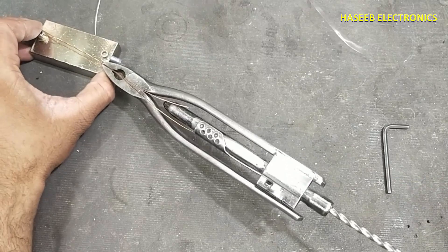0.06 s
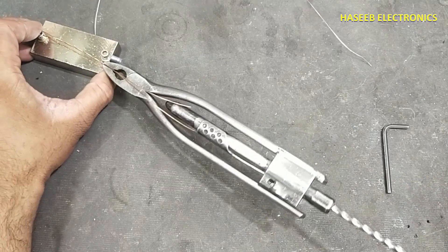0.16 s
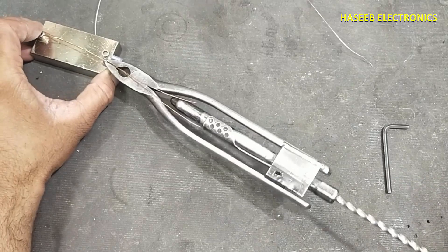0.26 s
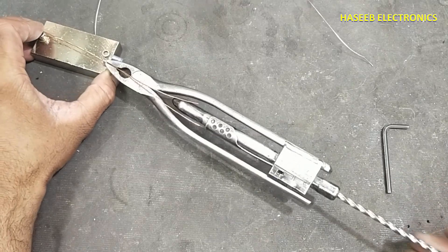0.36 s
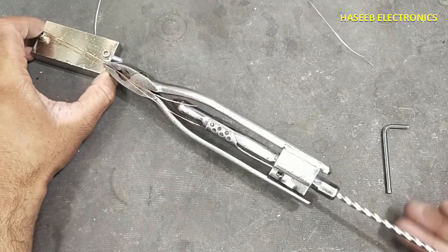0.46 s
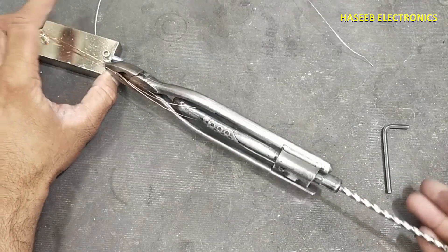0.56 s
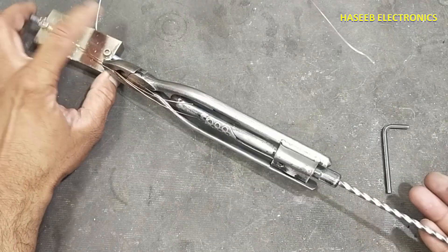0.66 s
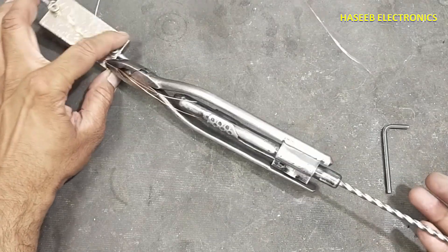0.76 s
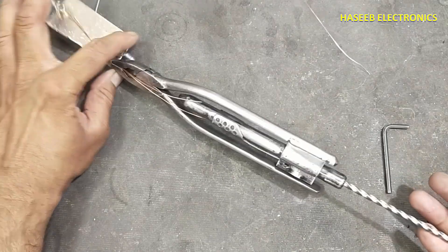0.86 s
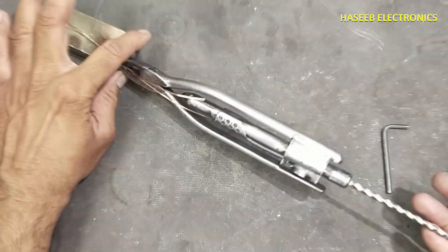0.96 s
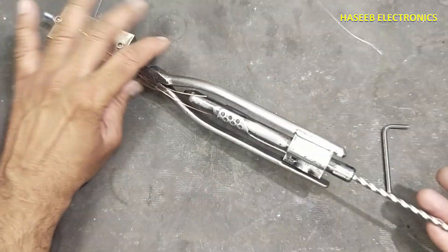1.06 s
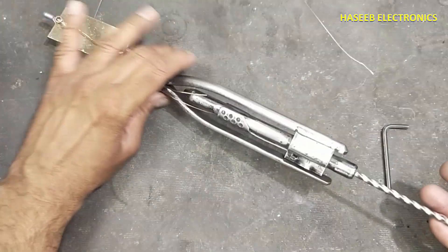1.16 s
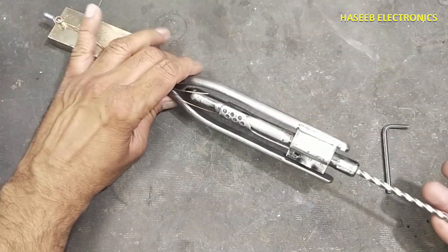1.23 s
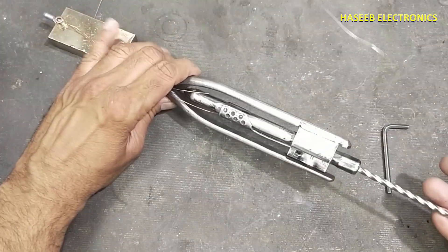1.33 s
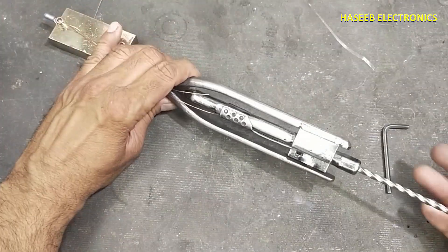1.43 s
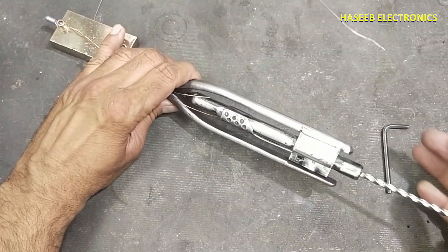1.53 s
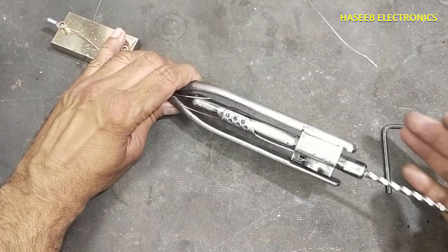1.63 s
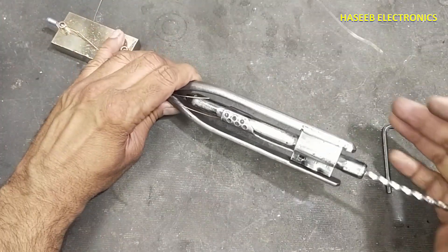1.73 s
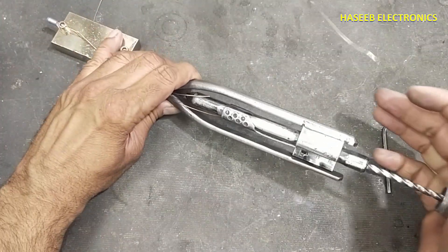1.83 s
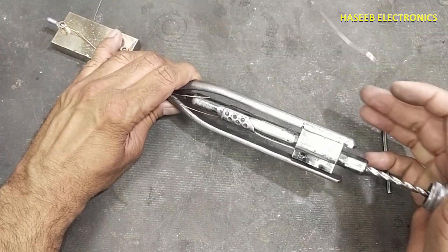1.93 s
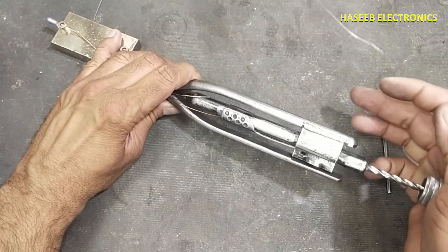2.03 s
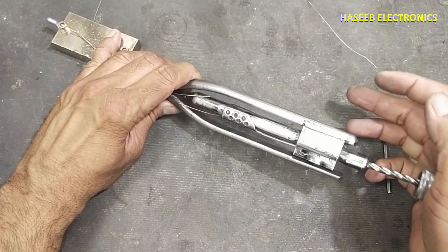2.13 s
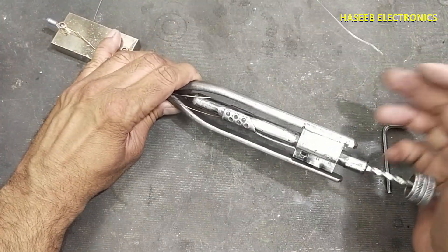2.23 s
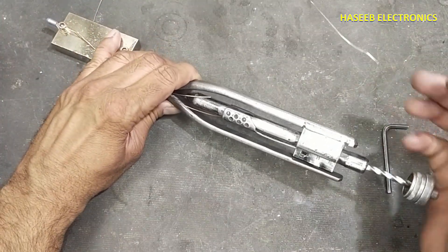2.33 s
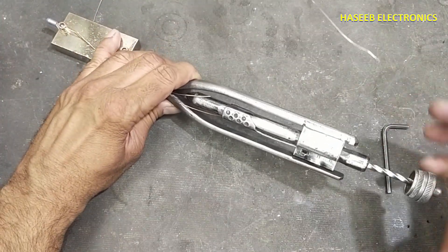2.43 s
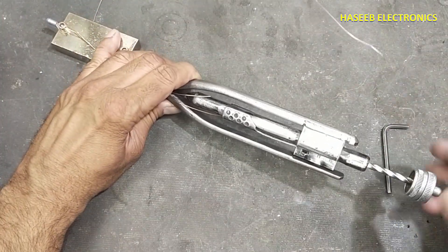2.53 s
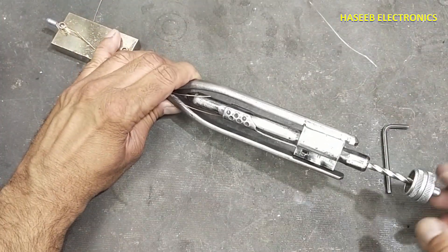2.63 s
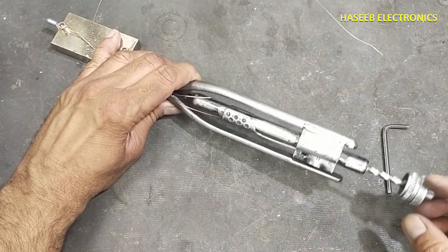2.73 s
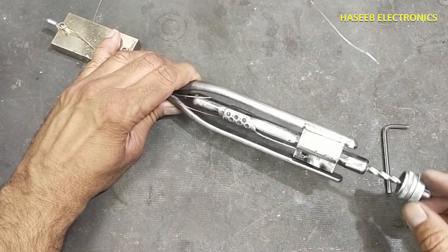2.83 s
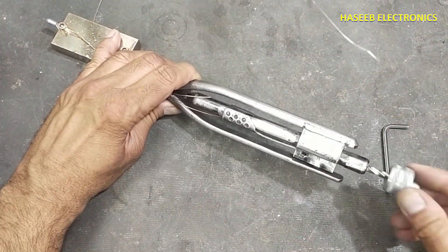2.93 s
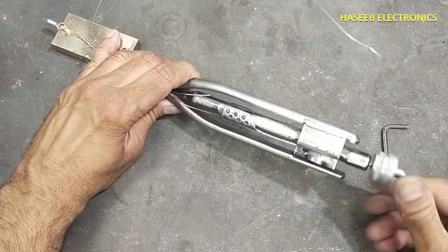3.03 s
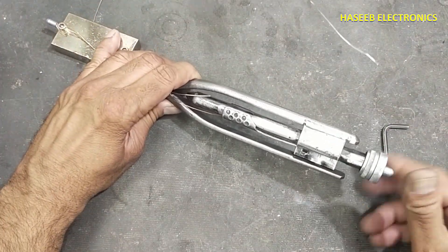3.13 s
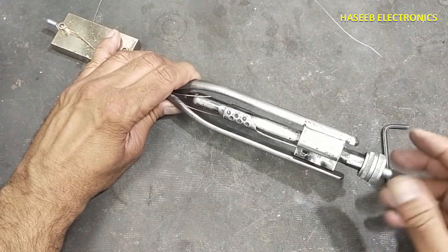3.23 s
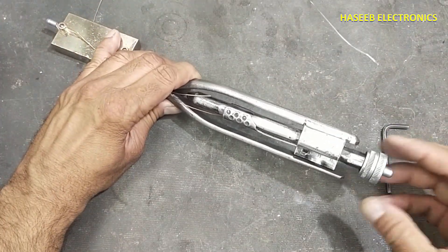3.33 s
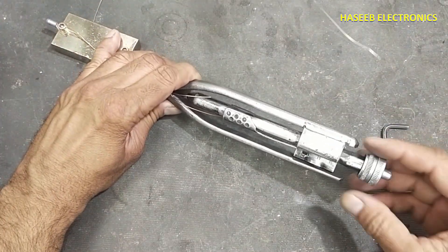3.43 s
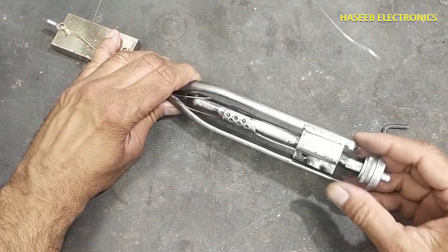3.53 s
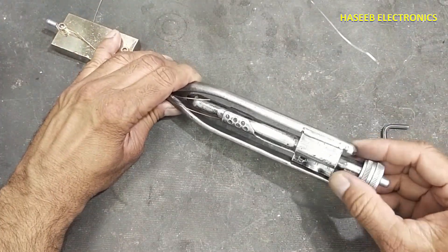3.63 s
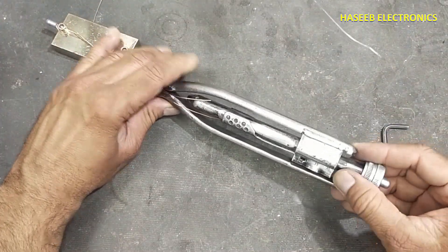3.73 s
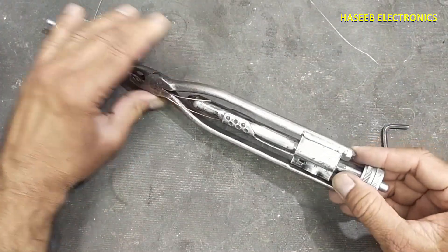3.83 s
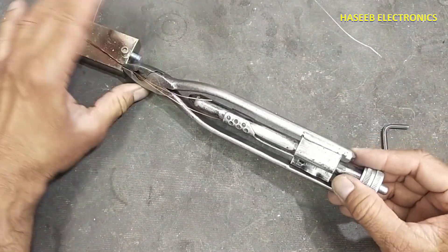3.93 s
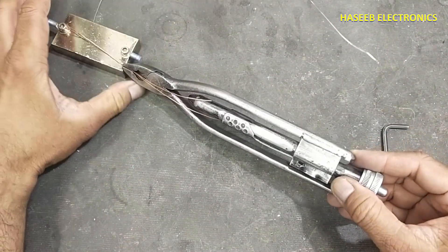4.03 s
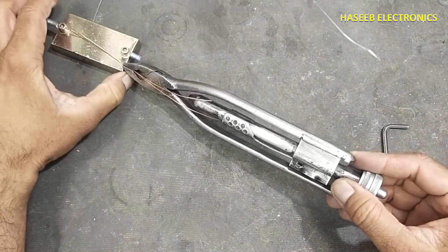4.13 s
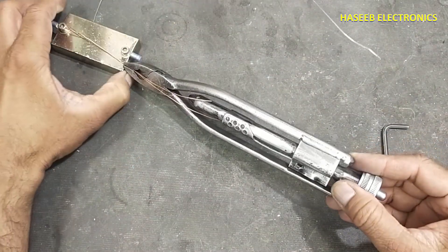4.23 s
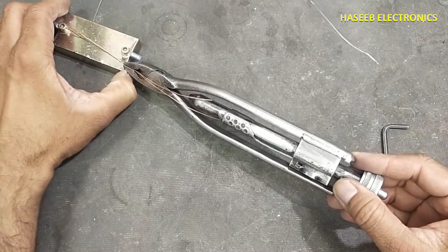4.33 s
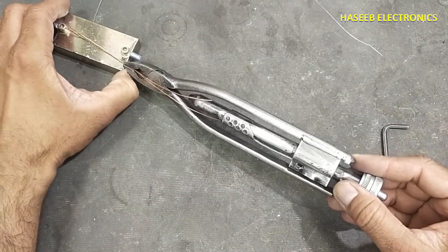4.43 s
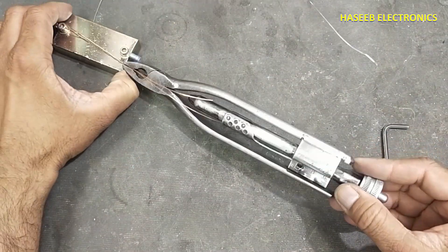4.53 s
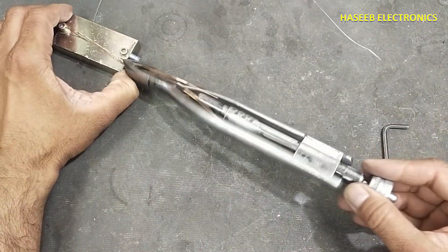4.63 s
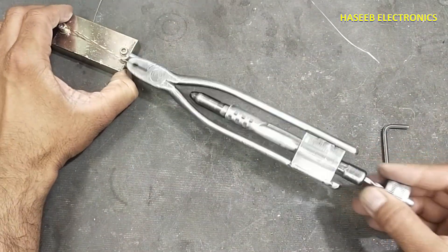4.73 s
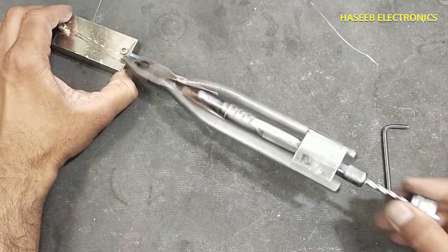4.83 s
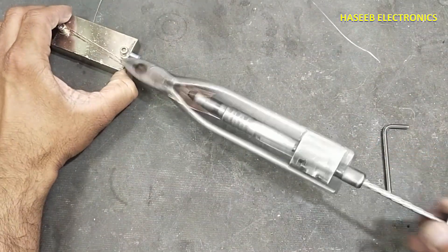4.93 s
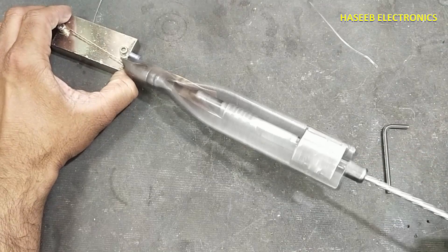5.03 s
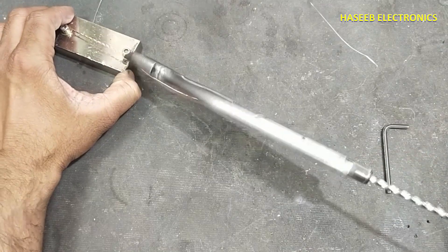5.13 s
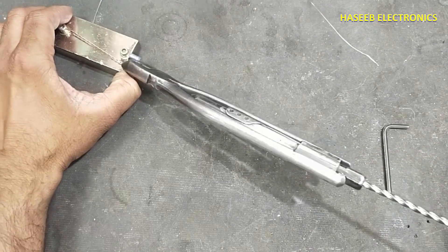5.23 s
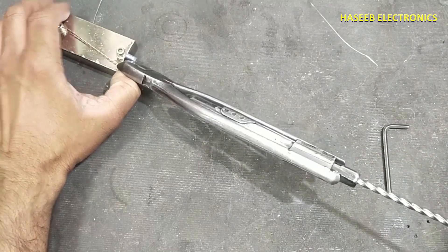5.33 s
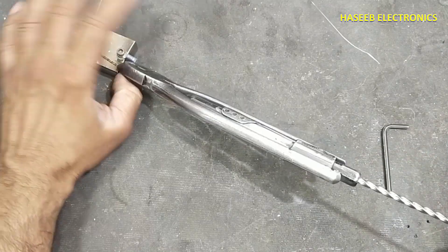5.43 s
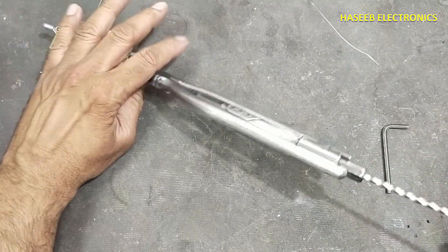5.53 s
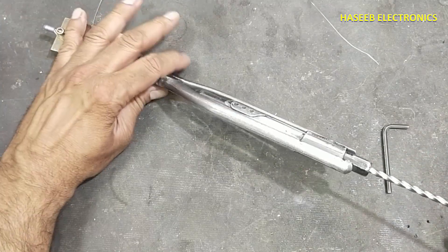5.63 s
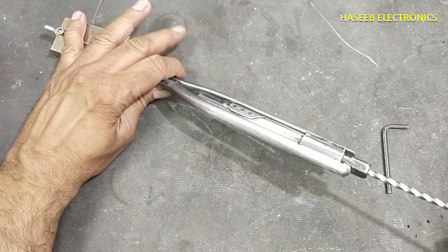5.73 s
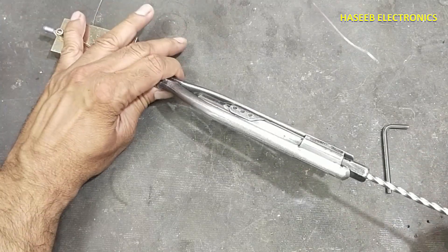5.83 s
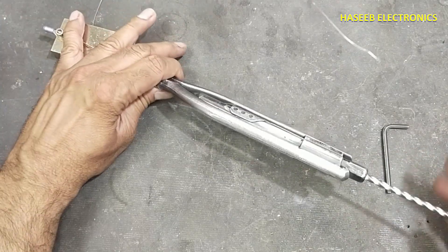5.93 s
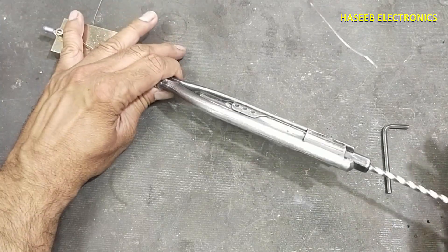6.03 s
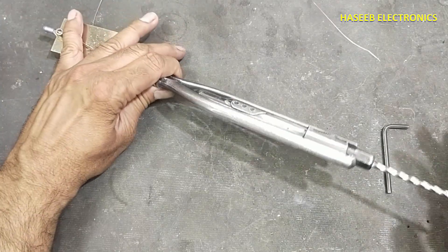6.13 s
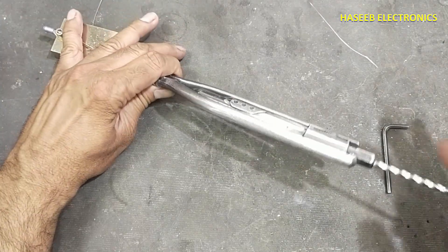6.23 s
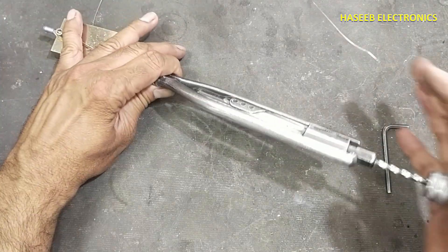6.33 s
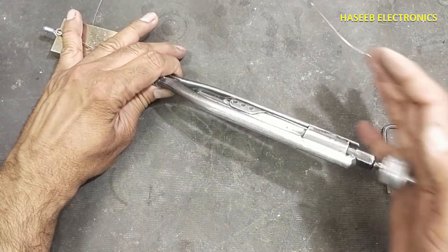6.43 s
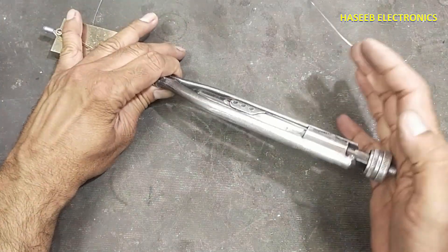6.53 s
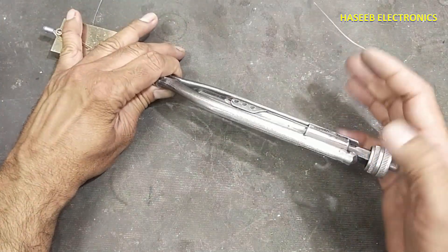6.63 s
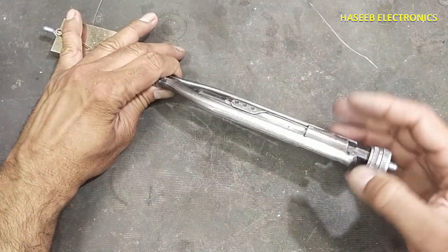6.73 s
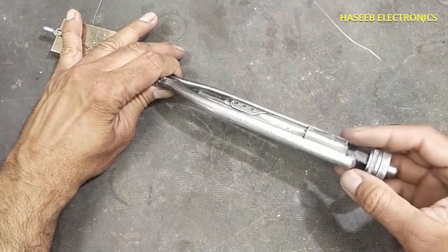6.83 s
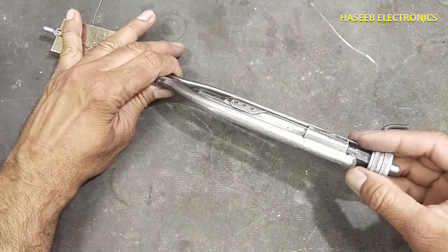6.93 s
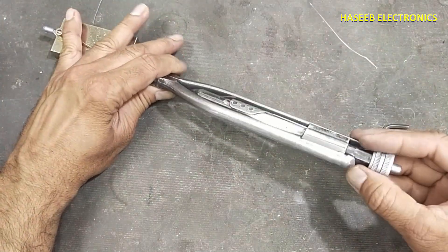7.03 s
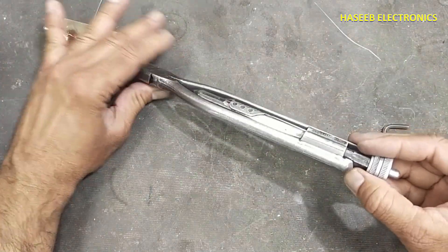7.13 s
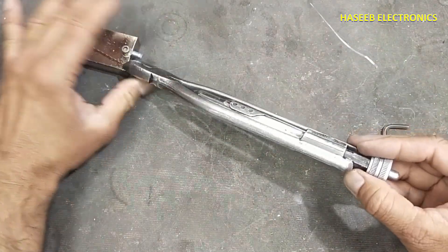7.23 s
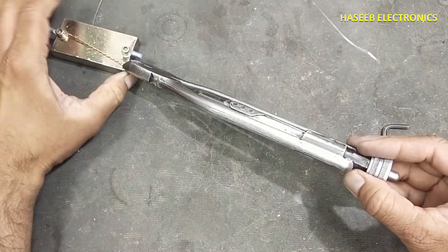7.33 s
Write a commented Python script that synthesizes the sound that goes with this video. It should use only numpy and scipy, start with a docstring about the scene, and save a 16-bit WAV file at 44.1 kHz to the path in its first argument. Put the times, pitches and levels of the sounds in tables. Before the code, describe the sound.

A low wavering hum and faint hiss fill a small hard room, heard close in stereo with the steel tool slightly right. At 0.2 s a tiny touch ticks; at 0.8-1.05 s a block drags and lands with a strong woody knock and smaller bumps. Soft hand brushing and faint clicks follow until 1.8 s. Faint spiral-rod scrapes run at 2.0-2.2 and 2.3-2.5 s; a stronger one from 2.9 s ends in a sharp, bright steel clack at 3.07 s. Quiet handling and light taps pass from 3.6 to 4.6 s. From 4.7 to 5.3 s a loud rasping pull brings rapid metallic rattles and low bench thumps, peaking around 5.1 s. Dragging and brushing ease off near 5.6 s. A fast, loudest scrape at 6.1-6.5 s ends in the brightest, hardest clack, ringing briefly; a duller contact clicks at 7.05 s.

```python
"""Wire-twisting pliers on a workbench, in a small hard room over a low hum and a faint hiss.
First hands brush the tool, the wire block drags and knocks, and light clicks and touches leave steel ringing.
Then the spiral rod scrapes through its nut in five ever louder runs, the later ones ending in steel clicks.
A pull on the knob spins the jaws, heard as rattles and bumps; a last contact rings near the end.
Clicks and scrapes are filtered noise, rings and booms are decaying modes, and noise tails make the room."""
import sys
import numpy as np
from scipy import signal
from scipy.fft import rfft, irfft, next_fast_len
from scipy.io import wavfile
from scipy.ndimage import map_coordinates

SR = 44100
rng = np.random.default_rng(int(sys.argv[2]) if len(sys.argv) > 2 else 0)


def store_pcm(level_fs):
    """Save levels as 16-bit WAV."""
    pcm = np.round(np.clip(level_fs, -1, 1) * 32767).astype(np.int16)
    wavfile.write(sys.argv[1], SR, np.atleast_2d(pcm).T)


N = 324576  # samples in the scene
TOP_HZ = 16000  # upper band limit

# Steel contacts of rod, knob and jaws. Each row: time in seconds, strength in dB,
# brightness in dB per octave.
CONTACTS = [(0.201, -39.5, -1.5), (0.862, -29.5, -4), (1.330, -29, -4), (1.505, -29, 3.5), (1.613, -28, -8),
            (1.776, -33, 4), (1.827, -33, 6.5), (2.937, -23, 7), (2.995, -21.5, 5), (3.035, -15.5, 1.5),
            (3.050, -10, 3.5), (3.071, -2.5, 3), (3.597, -33, -6.5), (3.646, -35.5, -2.5), (4.710, -27, -1),
            (4.818, -26, 0.5), (4.911, -11.5, 0.5), (4.944, -23, 5), (5.005, -19.5, -1.5),
            (5.021, -11.5, -0.5), (5.074, -6.5, -0.5), (5.181, -4, -3.5), (5.302, -20.5, -7.5),
            (5.560, -27, 6), (5.672, -33.5, 1.5), (5.906, -28.5, 0.5), (6.143, -22, 2), (6.183, -25.5, 6.5),
            (6.307, -10.5, 2.5), (6.437, -8, 2), (6.469, 4, 3), (7.052, -15.5, -3.5)]
# Runs of the spiral rod through its nut. Each row: start in seconds, stop in seconds,
# scraping level at the stop in dB.
ROD_RUNS = [(1.976, 2.16, -70), (2.27, 2.489, -63.5), (2.87, 3.065, -54), (4.689, 5.07, -43.5),
            (6.13, 6.475, -42)]


def amp(db):
    """Level: decibels become a linear amplitude ratio."""
    return 10 ** (np.asarray(db) / 20)


def unit(x):
    """Normalization: a signal is divided by its root mean square."""
    return x / np.sqrt(np.mean(x ** 2) + 1e-20)


def along(points, hz):
    """Logarithmic frequency scale: (Hz, value) points are joined by straight lines over log frequency."""
    f, v = np.transpose(points)
    return np.interp(np.log(hz + 1), np.log(f + 1), v)


def wobble(rate):
    """Slow random modulation: a smooth curve passes through rate random knots a second."""
    knots = rng.standard_normal(int(N * rate / SR) + 4)
    return map_coordinates(knots, [np.arange(N) * rate / SR])


def fade(t, t60):
    """Exponential decay: the amplitude falls by 60 dB in t60 seconds."""
    return np.exp(-np.log(1000) * t / t60)


def add(track, s, sound):
    """Superposition: a sound is summed into a track from s seconds onward."""
    part = track[:, max(round(s * SR), 0):][:, :sound.shape[-1]]
    part += sound[..., :part.shape[1]]


def coloured(x, db_of_hz):
    """Minimum phase: folding the cepstrum gives a causal filter with the stated gain in dB."""
    n = x.shape[-1]
    m = 2 * next_fast_len(n // 2 + 2048)
    gain = amp(db_of_hz(np.fft.rfftfreq(m, 1 / SR)))
    cepstrum = irfft(np.log(gain + 1e-6))
    cepstrum[1:m // 2] *= 2
    cepstrum[m // 2 + 1:] = 0
    response = np.exp(rfft(cepstrum))
    return irfft(rfft(x, m) * response, m)[..., :n]


def dulled(x, corner_hz):
    """Low-pass filtering: the treble rolls off above the corner at 12 dB per octave."""
    return signal.lfilter(*signal.butter(2, min(corner_hz, TOP_HZ), fs=SR), x)


def pair(size, alike):
    """Interaural correlation: left and right white noise share a common part, from 0 none to 1 all."""
    mid, side = rng.standard_normal((2, size))
    turn = np.arccos(np.clip(alike, -1, 1)) / 2
    return np.cos(turn) * mid + np.array([[1], [-1]]) * np.sin(turn) * side


def in_room(sound, wet_db, alike):
    """Reverberation: a fresh noise tail decays at its own rate in each band and follows the direct sound."""
    # Each row: frequency in Hz, reverberation time T60 in seconds.
    room_t60 = [(100, 0.65), (250, 0.32), (530, .8), (1400, 0.39), (3700, 0.44), (9700, 0.31),
                (16000, 0.25)]
    hz, t, z = signal.stft(pair(int(.7 * SR), alike), SR, nperseg=256)
    decaying = z * fade(t, along(room_t60, hz)[:, None])
    tail = signal.istft(decaying, SR, nperseg=256)[1]
    # reflections build up over about a millisecond
    tail *= 1 - np.exp(-np.arange(tail.shape[1]) / SR / 0.0013)
    response = amp(wet_db) * tail / np.linalg.norm(tail[0])
    response[:, 0] += 1
    return signal.fftconvolve(sound, response, axes=1)


def clicks(chatter_t60=0.036, bounce_db=-7, ring_db=-31, lead_db=-15):
    """Impact excitation: steel contacts chatter briefly, bounce once and leave the modes ringing."""
    # Each row: frequency in Hz, level in dB per Hz.
    clack = [(150, -18), (800, -15), (1700, -11), (3200, -8), (5200, -7.5), (7600, -5.5), (8400, -9),
             (12000, -12.5), (15500, -8)]
    # brightness tilts a click about this pitch, over this range
    pivot_hz, octaves_below, octaves_above = 5900, 2, 1.1
    lead_s = .004
    out, t = np.zeros((2, N)), np.arange(int(.4 * SR)) / SR
    since = np.maximum(t - lead_s, 0)
    for s, db, brightness_db in list(CONTACTS) + rod_ticks():
        def colour(hz):
            octaves = np.clip(np.log2((hz + 1) / pivot_hz), -octaves_below, octaves_above)
            return along(clack, hz) + brightness_db * octaves

        # a short faint noise before the blow
        lead_in = amp(lead_db) * (since == 0) * t / lead_s
        blow = fade(since, chatter_t60) * (1 - np.exp(-since / 0.00023)) + lead_in
        late = since - rng.uniform(.004, .008)
        bounce = amp(bounce_db) * (late > 0) * fade(np.abs(late), 0.022)
        point = contact_point(depth_db=3.2, spacing_hz=180)
        noise = pair(len(t), 0.086) * np.hypot(blow, bounce)
        crack = coloured(noise, lambda hz: colour(hz) + tool_db(hz) + point(hz))
        sound = crack + amp(ring_db) * (since > 0) * ring(since, colour)
        add(out, s - lead_s + .0005, in_room(amp(db) * sound, wet_db=-8, alike=0))
    return out


def rod_ticks():
    """Stick-slip: the running rod makes random small contacts, as rows like those of CONTACTS."""
    ticks_per_s = 12
    tick_db, spread_db = 11, 0.5  # relative to the scraping
    rows = []
    for start, stop, db in ROD_RUNS:
        chance = rng.random((16, 2))
        times = start + (np.arange(len(chance)) + chance[:, 0]) / ticks_per_s
        scrape_db = run_db((times - start) / (stop - start), db)
        levels = scrape_db + tick_db + spread_db * (2 * chance[:, 1] - 1)
        rows += [(s, level, 0) for s, level in zip(times, levels) if s < stop]
    return rows


def contact_point(depth_db, spacing_hz):
    """Modal coupling: each contact point favours other resonances, a random ripple in dB over frequency."""
    knots = rng.standard_normal(600)
    return lambda hz: depth_db * map_coordinates(knots, [hz / spacing_hz], mode="mirror")


def tool_db(hz):
    """Body resonance: the steel body adds humps and hollows to anything that excites it."""
    # Each row: centre in Hz, width in Hz, height in dB.
    humps = [(1815, 410, 4.5), (2410, 260, 6.5), (3114, 88, 7), (4120, 99, 3.5), (4600, 170, 4),
             (5190, 280, -5.5), (5740, 120, -0.5), (6950, 320, 6.5), (7510, 740, 4), (8600, 250, -2),
             (10300, 140, 2.5), (13440, 200, 7.5), (14830, 400, 1)]
    return sum(db / (1 + (2 * (hz - centre) / width) ** 2) for centre, width, db in humps)


def ring(t, db_of_hz):
    """Modal decay: long steel modes die away, with new levels and phases for each ear; loose parts waver them."""
    # Each row: frequency in Hz, relative level in dB, decay time T60 in seconds.
    steel_modes = [(2654, -7, 1), (2960, -8, 0.37), (4160, -2.5, .25), (4440, 2, .25), (4743, -9, 0.31),
                   (6760, -4, .3), (7310, -4.5, .28), (7100, -4, .25), (8258, -11.5, 0.23),
                   (10115, -0.5, 0.45), (13650, -5.5, .33)]
    hz, db, t60 = np.transpose(steel_modes)[:, :, None]
    level = amp(db + db_of_hz(hz) + 2 * rng.standard_normal((2, len(hz), 1)))
    phase = rng.uniform(0, 2 * np.pi, (2, len(hz), 1))
    # a random walk of phase broadens each spectral line
    width_hz = 22
    steps = rng.standard_normal((len(hz), len(t)))
    drift = np.cumsum(steps, axis=1) * np.sqrt(2 * np.pi * width_hz / SR)
    waves = np.exp(1j * (2 * np.pi * hz * t + drift)) * fade(t, t60)
    return np.real((level * np.exp(1j * phase))[:, :, 0] @ waves)


def bumps(push_hz=330, push_s=.0012, modes_db=-9, push_db=-1, knock_t60=0.027,
          soft_tilt_db=7, soft_stretch=1.0, low_cut_hz=55):
    """Plate vibration: a blow pushes the bench top once and sets it booming; hard blows add a woody knock."""
    # Bench-top modes. Each row: frequency in Hz, relative level in dB, decay time T60 in seconds.
    bench_modes = [(89.4, -22.5, 1), (144.4, -8, 0.42), (172.4, -25.5, 1), (203.4, 1, 0.17),
                   (221, -11, 0.62), (256, -11.5, .15), (305, -2.5, 0.11), (370.3, -17.5, 0.23),
                   (455, -20, 0.17), (534.5, -19.5, 0.27), (612, -21.5, 0.028)]
    # Each row: frequency in Hz, level in dB per Hz.
    knock_colour = [(100, -23.5), (420, 3.5), (560, 1), (660, -1.5), (850, -4.5), (1050, 5.5), (1180, -3),
                    (1300, 2), (1500, -15.5), (1900, -10.5), (2600, -23), (5000, -32), (16000, -44.5)]
    out = np.zeros((2, N))
    # the boom reaches the left ear a tenth of a millisecond sooner
    t = np.arange(int(.6 * SR)) / SR + np.array([[.0001], [0]])
    u = t - 2 * push_s
    for s, db, knock_db in bench_blows():
        # a padded blow knocks less, pushes for longer and favours the low modes
        softness = np.interp(-knock_db, [13, 31], [0, 1])
        slow = u / (1 + soft_stretch * softness)
        push = np.cos(2 * np.pi * push_hz * slow) * np.exp(-(slow / push_s / np.sqrt(2)) ** 2)
        push *= 1 - np.exp(-t / .0004)
        boom = 0
        for hz, level, t60 in bench_modes:
            tilt = -soft_tilt_db * softness * np.log2(hz / 220)
            gain = amp(level + tilt + rng.normal(0, 2))
            boom = boom + gain * np.cos(2 * np.pi * hz * u) * fade(t, t60)
        boom *= 1 - np.exp(-t / 0.0023)
        point = contact_point(depth_db=3.5, spacing_hz=92.54)
        noise = coloured(pair(t.shape[1], 1.0), lambda hz: along(knock_colour, hz) + point(hz))
        knock = unit(noise) * fade(t, knock_t60)
        # the heavier the blow, the more the first push stands out from the boom
        body = amp(push_db + .5 * max(db, -15)) * push + amp(modes_db) * boom
        add(out, s, amp(db) * in_room(body, wet_db=-10, alike=0.76))
        add(out, s + .001, amp(db + knock_db) * in_room(knock, wet_db=-4.0, alike=.3))
    # a gentle high-pass takes the slow offset out of the push pulses
    return signal.lfilter(*signal.butter(1, low_cut_hz, "highpass", fs=SR), out)


def bench_blows():
    """Momentum transfer: direct blows, the drop after each heavy one, and jolts passed on by heavy clicks."""
    # Each row: time in seconds, blow level in dB, hard knock in dB relative to the blow.
    blows = [(0.201, -32, -33.5), (0.830, -25, -23), (0.858, -22, -9), (0.874, -2.5, -2.5),
             (0.973, -13.5, -15), (0.995, -12.5, -13.5), (1.030, -18, -14), (1.611, -28, -12.5),
             (3.597, -32.5, -7.5), (3.647, -39, -13), (3.848, -40.5, -12.5), (4.277, -38, 0.5),
             (4.319, -40, -6.5), (4.455, -39, -8), (4.498, -44, -11.5), (4.544, -39.5, -7.5),
             (4.713, -25, -20.5), (4.774, -20, -30), (4.822, -13, -28), (4.838, -18.5, -26),
             (4.909, -11, -21), (5.007, -11, -22.5), (5.020, -10, -15), (5.038, -9, -24.5),
             (5.089, -2, -12.5), (5.180, -21.5, -2), (5.302, -34.5, 0), (5.349, -22.5, -19),
             (5.681, -30, -23.5), (5.909, -42, -23), (6.191, -40, -28), (6.312, -34.5, -8.5),
             (7.052, -22.5, -18)]
    heavy_db = -14
    # a heavy blow lifts the tool, which drops back under its own weight
    fall_s, fall_db, fall_knock_db = .0102, -19, -19.5
    # the part of a heavy click that reaches the bench (relative to the click), and its knock
    jolt_db, jolt_knock_db = -37.5, -3.5
    drops = [(s + fall_s, fall_db, fall_knock_db) for s, db, _ in blows if db > heavy_db]
    jolts = [(s, db + jolt_db, jolt_knock_db) for s, db, _ in CONTACTS if db > heavy_db]
    return list(blows) + drops + jolts


def rubbing(wet_db=-7, nudge_db=3.0, grip_db=-6, pressed_hz=1050, nudged_hz=10500):
    """Friction noise: the block drags, skin brushes the tool and the rod scrapes its nut in tiny catches."""
    # Block over bench. Each row: strongest moment in seconds, length in seconds, level in dB.
    block_drags = [(0.04, .3, -55.5), (0.77, 0.58, -58.5), (0.93, 0.52, -39), (1.3, 1, -57.5),
                   (4.07, 0.16, -64.5), (4.93, 1, -54.5), (5.53, 0.15, -46), (6.6, .55, -64.5),
                   (7.25, 0.24, -70.5)]
    # Hands over tool. Each row: strongest moment in seconds, length in seconds, level in dB.
    hand_strokes = [(0.04, .38, -57), (0.44, 0.47, -69.5), (0.76, 0.43, -67.5), (1.08, 0.63, -51.5),
                    (1.56, 0.96, -58), (2.5, .5, -69.5), (3.42, 1, -64), (4.78, 0.24, -56.5),
                    (5.57, 0.5, -57), (5.95, 0.87, -67), (6.88, .2, -67.5), (7.25, 0.29, -65)]
    # Spectra of block, skin and rod. Each row: frequency in Hz, level in dB per Hz.
    drag_colour = [(120, -21.5), (300, 4), (600, -4.5), (850, -4.5), (1050, 3), (1250, -6.5), (1550, -2.5),
                   (2500, -22), (8000, -51)]
    skin_colour = [(700, -29), (1700, -6), (2700, 1.5), (4000, -4.5), (6000, -11.5), (16000, -29)]
    slide_colour = [(2000, -31), (5000, -2.5), (7000, 3.5), (9000, 0), (12000, 2.5), (15500, -4.5)]
    block = swells(block_drags, rise_share=.24)
    hand = swells(hand_strokes, rise_share=0.51)
    rod = rod_scrape()
    grit = amp(2 * wobble(250))
    catches = amp(2.5 * wobble(400) + 1.2 * wobble(35))

    def drag():
        return unit(coloured(pair(N, .6) * grit, lambda hz: along(drag_colour, hz)))

    def slide():
        noise = pair(N, 0.16) * catches
        return unit(coloured(noise, lambda hz: along(slide_colour, hz) + 0.61 * tool_db(hz)))

    skin = unit(coloured(pair(N, 0.2) * grit, lambda hz: along(skin_colour, hz)))
    # between these two levels a drag grows dull, as the block is pressed down
    light_db, heavy_db = -57, -42.5
    pressed = np.interp(block, amp([light_db, heavy_db]), [0, 1])
    dull_drag = dulled(drag(), pressed_hz)
    dragging = block * (np.sqrt(1 - pressed) * drag() + np.sqrt(pressed) * dull_drag)
    # a running rod rubs the fingers that grip it
    brushing = (hand + amp(grip_db) * rod) * skin
    # a stroke of the hand nudges the rod into a duller scrape
    sliding = rod * slide() + amp(nudge_db) * hand * dulled(slide(), nudged_hz)
    return in_room(dragging + brushing + sliding, wet_db, alike=0)[:, :N]


def swells(strokes, rise_share):
    """Amplitude envelope: each stroke swells for a share of its length and eases off for the rest."""
    t = np.arange(N) / SR
    gain = np.zeros(N)
    for s, length, db in strokes:
        height = np.interp((t - s) / length, [-rise_share, 0, 1 - rise_share], [0, 1, 0])
        gain += amp(db) * np.sin(height * np.pi / 2) ** 2
    return gain


def rod_scrape(uneven_db=4.5, start_s=.022, settle_t60=0.9):
    """Sliding friction: each run gets going, gathers level and shivers out, as the rod binds and frees."""
    t = np.arange(N) / SR
    binding = amp(uneven_db * wobble(30))
    gain = np.zeros(N)
    for start, stop, db in ROD_RUNS:
        onset = np.clip((t - start) / start_s, 0, 1)
        level = amp(run_db((t - start) / (stop - start), db))
        gain += onset * level * fade(np.maximum(t - stop, 0), settle_t60)
    return binding * gain


def run_db(progress, stop_db, gather_db=8.5):
    """Speed-dependent friction: scraping grows as the rod gathers speed, from start (0) to stop (1)."""
    return stop_db - gather_db * (1 - np.clip(progress, 0, 1))


def tings(tick_db=-3, damped_t60=0.53):
    """Selective excitation: a light touch ticks and wakes the modes near one pitch, damped by the fingers."""
    # Each row: time in seconds, level in dB, favoured frequency in Hz.
    touches = [(0.202, -42.5, 8258), (1.507, -39, 2654), (1.615, -43, 2654), (2.115, -61, 13650),
               (2.165, -53.5, 4743), (2.167, -53.5, 10115), (3.753, -41.5, 2654), (4.276, -42.5, 1900),
               (4.824, -34, 2654), (4.931, -32, 2654), (7.052, -39.5, 8258)]
    out, t = np.zeros((2, N)), np.arange(SR // 2) / SR
    for s, db, pitch_hz in touches:
        def octaves(hz):
            return np.abs(np.log2((hz + 1) / pitch_hz))

        song = ring(t, lambda hz: -120 * octaves(hz)) * fade(t, damped_t60)
        tick = unit(coloured(pair(len(t), 0.18), lambda hz: -25 * octaves(hz))) * fade(t, 0.02)
        add(out, s, amp(db) * in_room(song + amp(tick_db) * tick, wet_db=-0.5, alike=0))
    return out


def hum(hum_hz=119, tone_db=-5):
    """Frequency modulation: a low tone wavers in pitch and level inside a dull drone of filtered noise."""
    # Each row: time in seconds, relative level in dB.
    hum_level = [(0, -46), (1.7, -48.5), (2.1, -57), (2.8, -60), (3.3, -55.5), (4.5, -52.5), (6.0, -52),
                 (7.36, -59)]
    # Each row: frequency in Hz, level in dB per Hz.
    drone_colour = [(25, -24.5), (55, -27.5), (80, -5.5), (98, -6.5), (118, -5.5), (135, -8), (156, 0),
                    (172, -12), (190, 5), (215, -19.5), (260, -19), (400, -27), (1000, -56)]
    level_db = np.interp(np.arange(N) / SR, *np.transpose(hum_level))
    drone = unit(coloured(pair(N, 0.89), lambda hz: along(drone_colour, hz)))
    phase = 2 * np.pi * np.cumsum(hum_hz + 2.5 * wobble(7)) / SR
    tone = unit(np.sin(phase) * amp(1.5 * wobble(5)))
    return amp(level_db) * (amp(-1.0) * drone + amp(tone_db) * tone)


def air(air_db=-74):
    """Stationary noise: the faint hiss of the room keeps a steady level and colour."""
    # Each row: frequency in Hz, level in dB per Hz.
    air_colour = [(200, -13.5), (500, -2.5), (1000, -3.5), (1100, -4.5), (1300, -5), (3000, -11),
                  (7000, -10), (15000, -25)]
    return amp(air_db) * unit(coloured(pair(N, 0.16), lambda hz: along(air_colour, hz)))


def scene():
    """Interaural level difference: the tool lies a little to the right of the microphones."""
    steel = (clicks() + tings() + rubbing()) * amp([[-.8], [.8]])
    bench = (bumps() + hum()) * amp([[-.6], [.6]])
    return steel + bench + air()


def record(dry):
    """Overload and band limiting: peaks flatten at full scale, then all above the band limit is removed."""
    m = next_fast_len(N + SR // 2)
    keep = np.fft.rfftfreq(m, 1 / SR) < TOP_HZ
    return irfft(rfft(np.clip(dry, -1, 1), m) * keep, m)[:, :N]


dry = scene()
out = record(dry)
store_pcm(out)
```